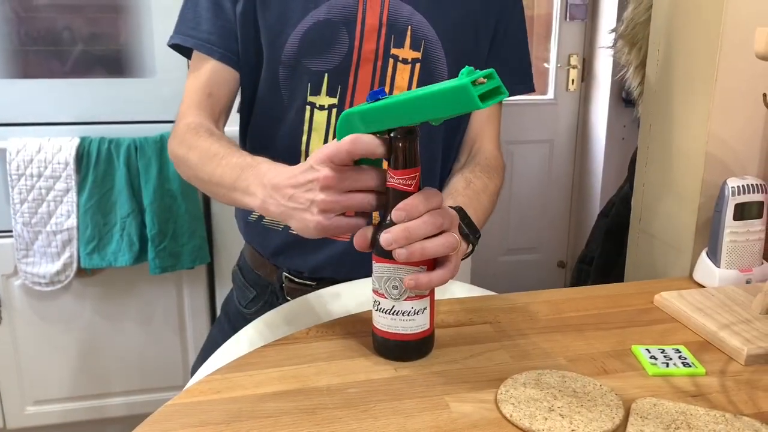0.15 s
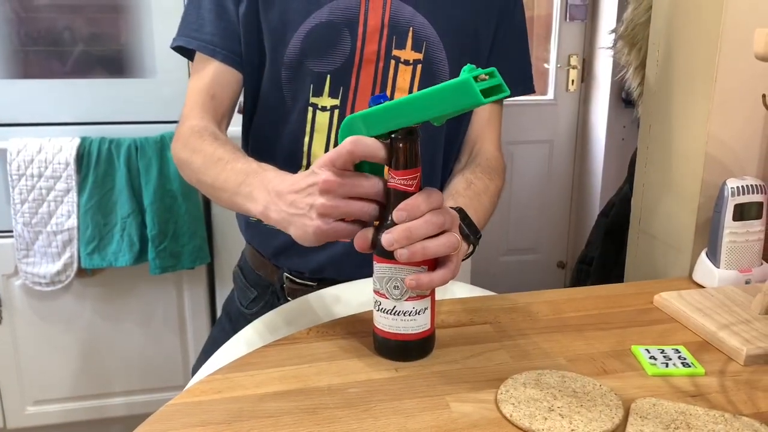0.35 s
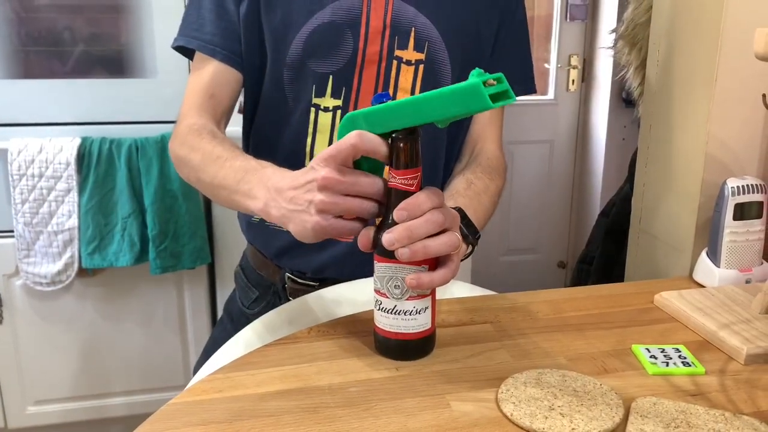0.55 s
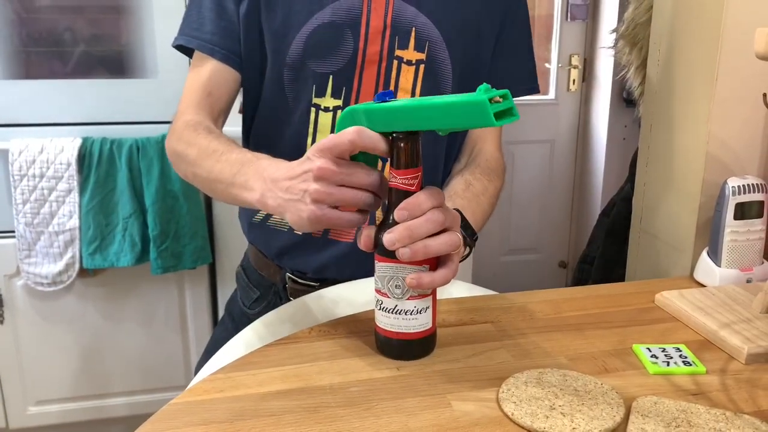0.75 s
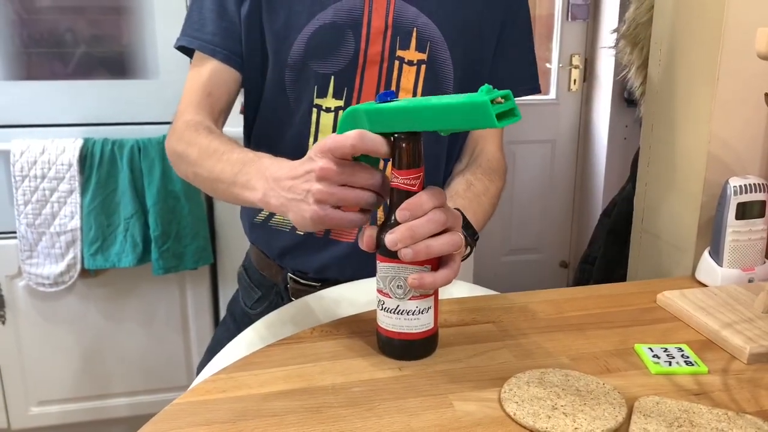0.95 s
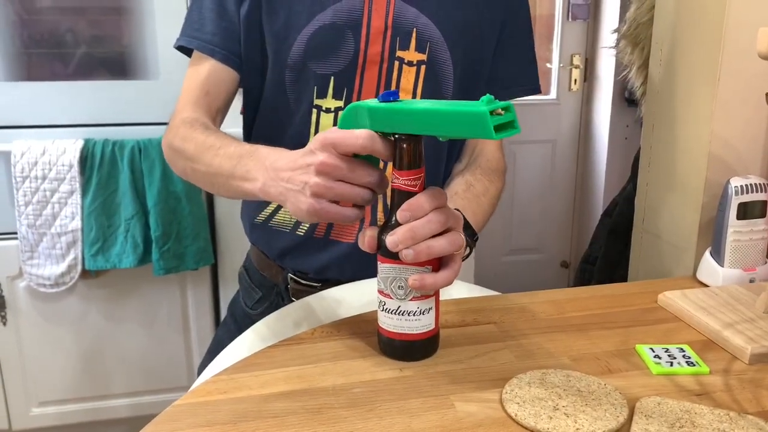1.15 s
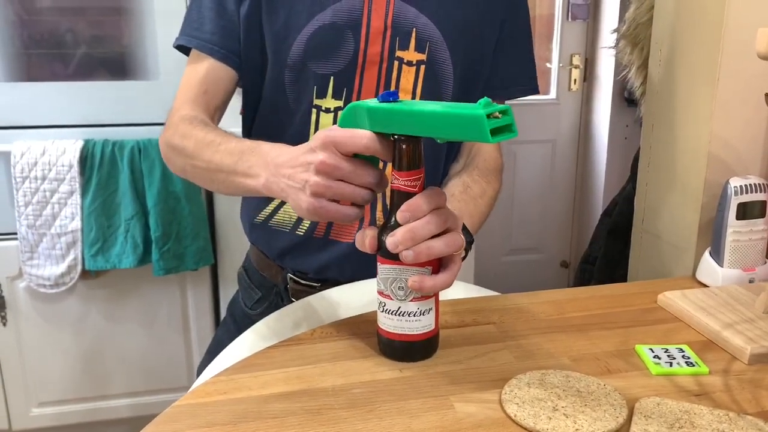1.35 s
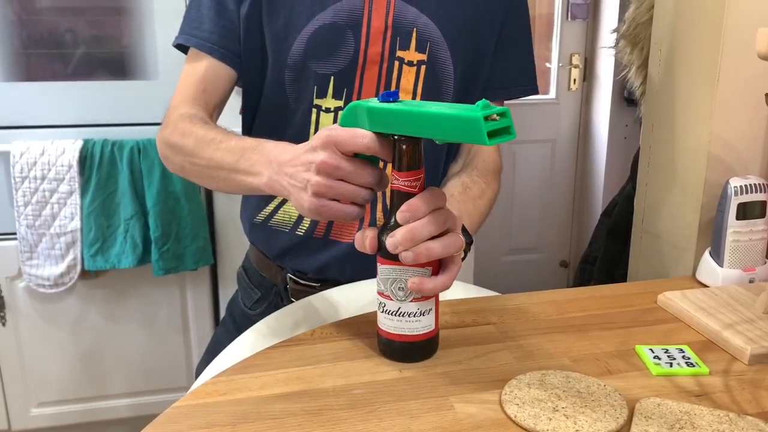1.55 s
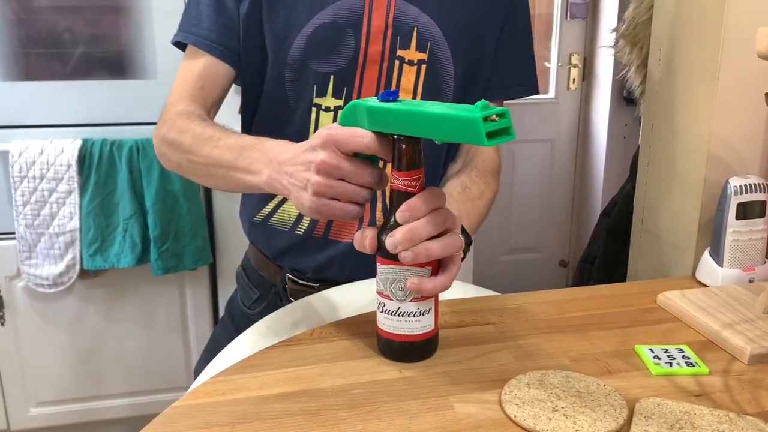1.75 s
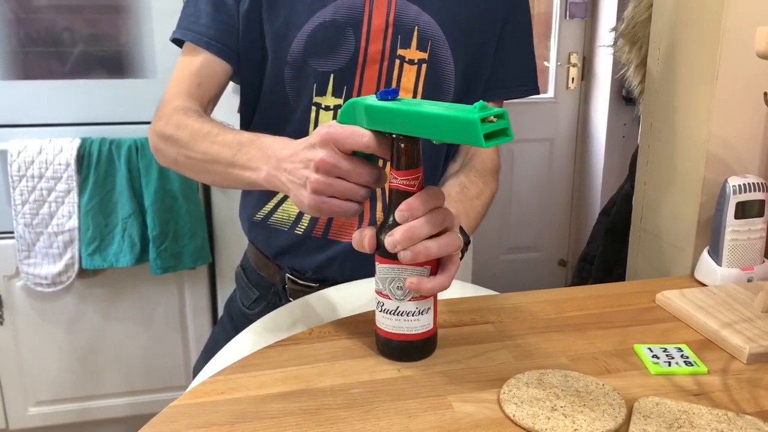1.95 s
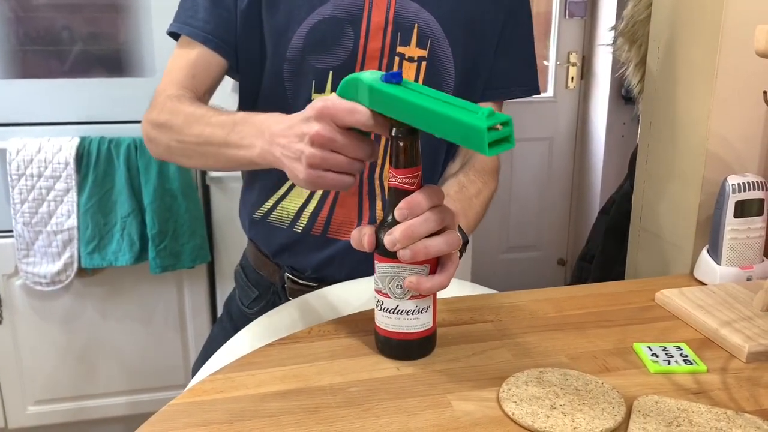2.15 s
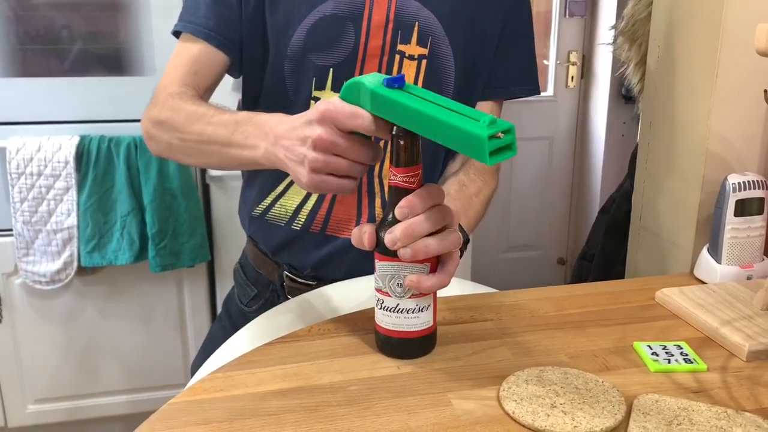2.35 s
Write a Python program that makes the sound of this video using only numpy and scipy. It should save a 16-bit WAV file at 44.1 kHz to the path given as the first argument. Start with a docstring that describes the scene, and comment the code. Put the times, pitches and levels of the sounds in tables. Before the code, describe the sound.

A plastic bottle opener clacks against a glass bottle, then snaps rapidly and pops the cap off

```python
"""Opening a bottle with a plastic opener

A pistol-shaped plastic opener works on a glass bottle on a wooden table: snaps are noise cracks with ringing
modes, knocks on the bottle add table thumps, rubs on the cap are grainy noise, bumps are low damped modes.
The cap comes off in a sharp noise burst and a short ring of decaying sines. Shaped noise makes the low room
rumble and the faint taps, two of them a second apart as of a wall clock. A small kitchen adds echoes and a tail."""
import sys
import numpy as np
from scipy import signal
from scipy.fft import rfft, irfft
from scipy.io import wavfile

SR = 44100
rng = np.random.default_rng(int(sys.argv[2]) if len(sys.argv) > 2 else 0)


def wav_out(sig):
    """Save sig, one row per channel (or a flat mono array), as 16-bit PCM at SR to the path in sys.argv[1]."""
    wavfile.write(sys.argv[1], SR, np.round(np.clip(np.atleast_2d(sig).T, -1, 1) * 32767).astype(np.int16))


N = 110250
T = np.arange(N) / SR
HZ = np.arange(N // 2 + 1) * SR / N
SHORT = T[:8192]  # time axis of one contact
HALF_SECOND = T[:SR // 2]  # time axis of rings and of the room tail


def from_db(db):
    """Decibels to gain."""
    return 10 ** (np.asarray(db) / 20)


def at_hz(points, hz, axis=1):
    """Read a table column, interpolated along log frequency."""
    p = np.array(points)
    return np.interp(np.log(hz + 1e-9), np.log(p[:, 0]), p[:, axis])


def noise(points, size, tilt_db=0):
    """Random noise of rms 1 with a drawn spectrum; the treble tilts by tilt_db per octave above a knee."""
    knee_hz = 3180
    hz = np.arange(size // 2 + 1) * SR / size
    octaves_up = np.log2(np.maximum(hz / knee_hz, 1))
    gain = from_db(at_hz(points, hz) + tilt_db * octaves_up)
    x = irfft(rfft(rng.standard_normal(size)) * gain, size)
    return x / x.std()


def grit(t):
    """Many tiny contacts make the level chatter; the gain has rms 1."""
    spread_db, grain_s = 2.5, 0.0014
    steps = np.clip(rng.standard_normal(len(t)), -2, 2)
    gain = from_db(spread_db * np.interp(t / grain_s, np.arange(len(t)), steps))
    return gain / np.sqrt(np.mean(gain ** 2))


def burst(points, rise_s, decay_s, tilt_db=0):
    """A contact excites dense, chattering vibration that dies exponentially."""
    attack = 1 - np.exp(-SHORT / rise_s)
    decay = np.exp(-SHORT / decay_s)
    return noise(points, len(SHORT), tilt_db) * grit(SHORT) * attack * decay


def ring(modes):
    """A struck body sounds as decaying sines; neighbouring modes start in opposite directions."""
    t = HALF_SECOND
    out = np.zeros(len(t))
    for k, (hz, db, t60) in enumerate(modes):
        decay = from_db(db - 60 * t / t60)
        out += (-1) ** k * decay * np.sin(2 * np.pi * hz * t)
    return out


def add(out, s, db, sound):
    """Mix a sound in at a time and level."""
    i = int(np.clip(s * SR, 0, N - 1))
    out[i:i + len(sound)] += from_db(db) * sound[:N - i]


def room_tone():
    """Rumble common to both sides, with a faint wide hiss from a side signal."""
    # rumble and hiss spectrum: (frequency [Hz], level [dB])
    floor = [(20, -1.5), (35, 0), (65, 2), (100, -8), (200, -16), (400, -24.5), (750, -27.5), (1020, -25),
             (1400, -29), (3000, -38), (7000, -47.5), (9500, -40), (14500, -46.5), (16000, -52)]
    # stereo width: (frequency [Hz], side against mid [dB])
    floor_apart = [(30, -17), (120, -13), (400, -4.5), (1000, -2), (4000, -0.5), (15000, -0.5)]
    mid = noise(floor, N)
    side = irfft(rfft(noise(floor, N)) * from_db(at_hz(floor_apart, HZ)), N)
    return from_db(-63) * np.array([mid + side, mid - side])


def kitchen():
    """The room answers a click with a diffuse tail that builds up, then dies band by band."""
    # room tail: (frequency [Hz], reverberation [dB], t60 [s], left-right likeness [-1 to 1])
    room = [(97.6, -9, 1, 0.65), (300, -3, .26, -0.059), (800, -3, 0.34, 0.13), (2000, -3, 0.28, -0.4),
            (5000, -3, 0.28, 0.0037), (8870, -9.5, 0.2, 0.29), (15000, -4, .175, -0.2)]
    build_s = 0.0033
    t, out = HALF_SECOND, 0
    edges = np.geomspace(45, 18000, 14)
    for low, high in zip(edges, edges[1:]):
        hz = np.sqrt(low * high)
        db, t60 = at_hz(room, hz), at_hz(room, hz, axis=2)
        alike = np.clip(at_hz(room, hz, axis=3), -1, 1)
        mid, side = rng.standard_normal((2, len(t)))
        shape = np.exp(-np.log(1000) * t / t60) * (1 - np.exp(-(t / build_s) ** 2))
        opposed = side * np.array([[1], [-1]])
        tail = shape * (np.sqrt(1 + alike) * mid + np.sqrt(1 - alike) * opposed)
        band = signal.butter(2, [low, high], "band", fs=SR, output="sos")
        tail = signal.sosfilt(band, tail)
        # energy in proportion to bandwidth, before the band's own level
        bandwidth_share = (high - low) / (SR / 2)
        energy = np.sum(tail ** 2) / 2
        out = out + tail * from_db(db) * np.sqrt(bandwidth_share / energy)
    return out


def ticks():
    """Faint ticks and taps across the room, noise bursts with a slow, blurred onset."""
    # faint ticks and taps: (time [s], level [dB])
    taps = [(.617, -49), (.850, -63.5), (1.628, -51)]
    # their spectrum: (frequency [Hz], level [dB])
    tick_spectrum = [(150, -12), (550, -6), (800, -3.5), (1000, 5), (1200, -2.5), (1450, -10.5),
                     (2500, -14), (5000, -20), (9000, -43), (15000, -47)]
    out = np.zeros(N)
    for s, db in taps:
        add(out, s, db, burst(tick_spectrum, rise_s=0.011, decay_s=0.022))
    return out


def bumps():
    """Soft contacts of the hands and bottle set the lowest modes of the table going."""
    # dull bumps: (time [s], level [dB])
    contacts = [(0.033, -47.5), (0.225, -39), (.305, -43), (.462, -47.5), (.505, -50), (2.053, -44),
                (2.202, -42.5), (2.219, -33.5)]
    # low table modes: (frequency [Hz], level [dB], t60 [s])
    bump_modes = [(57, -9.5, .26), (69, 2.5, 0.14), (106, -8.5, 0.39), (130.4, -5.5, .2), (172, -8, 0.054),
                  (204.3, -7.5, .2)]
    contact_s = 0.0011
    out = np.zeros(N)
    push = SHORT * np.exp(-2 * np.pi * SHORT / contact_s)
    boom = signal.fftconvolve(ring(bump_modes), push / push.sum())
    for s, db in contacts:
        add(out, s, db, boom)
    return out


def rubs():
    """Plastic slides on the cap: grainy friction noise swells and dies away."""
    # strokes: (time of the peak [s], level [dB], rise [s], fall [s], brightness [dB per octave])
    strokes = [(.075, -61.5, .04, .012, -16), (.106, -57, 0.023, .016, -8.5),
               (1.462, -67, 0.013, 0.022, 1.5), (1.582, -57.5, 0.034, 0.0054, 2.5)]
    # friction spectrum: (frequency [Hz], level [dB])
    rub_spectrum = [(300, -10), (1000, -14.5), (1800, -5.5), (2600, -13.5), (4800, -10), (6000, -8),
                    (8800, -3), (9800, 7.5), (10800, -7.5), (13300, -3), (15500, -6)]
    grain_db, grain_count = 2.5, 1200  # spread of the level, and its random points over the whole scene
    out = np.zeros(N)
    for s, db, rise_s, fall_s, tilt_db in strokes:
        grain = np.interp(T, np.linspace(0, T[-1], grain_count), rng.standard_normal(grain_count))
        stroke = np.exp(np.minimum(T - s, 0) / rise_s - np.maximum(T - s, 0) / fall_s)
        out += from_db(db + grain_db * grain) * stroke * noise(rub_spectrum, N, tilt_db)
    return out


def slide():
    """The slide strikes home: it clacks against the bottle, which thumps the table top."""
    # blows: (time [s], clack [dB], thump into the table [dB])
    blows = [(0.2211, -20.5, -36), (0.2286, -26.5, -21.5), (0.2328, -43.5, -21.5), (2.0242, -35.5, -59)]
    # clack spectrum: (frequency [Hz], level [dB])
    clack_spectrum = [(40, -24), (150, -2.5), (420, -9.5), (600, 1), (1000, -25.5), (1370, 5.5), (1600, -4),
                      (1850, 0), (2150, -0.5), (2600, -6.5), (3500, -16.5), (4700, -10), (6000, -27.5),
                      (10000, -28), (15000, -30.5)]
    # ringing of the clack, then of the table top: (frequency [Hz], level [dB], t60 [s])
    clack_modes = [(734, -23.5, .1), (1350, -12, 0.095), (1830, -17, 0.057), (2143, -16, .12),
                   (3120, -29.5, .1), (4770, -25.5, 0.16)]
    table_modes = [(132.5, -6, .24), (170.5, -1.5, 0.15), (206, -13.5, 0.13), (320, 1, .11),
                   (345, -14, .09), (580, -24.5, .08)]
    out = np.zeros(N)
    for s, clack_db, thump_db in blows:
        add(out, s, clack_db, burst(clack_spectrum, rise_s=0.00028, decay_s=0.0046))
        add(out, s, clack_db, ring(clack_modes))
        add(out, s, thump_db, ring(table_modes))
    return out


def opener():
    """Each snap of the mechanism is a crack, a hollow housing knock and a brief ring of the plastic."""
    # snaps: (time [s], crack [dB], treble slope [dB per octave], rise [s], decay [s], housing knock [dB])
    snaps = [(0.191, -51, -5.5, 0.0038, 0.038, -45), (.2138, -24.5, 1.5, 0.00022, 0.0052, -38.5),
             (0.4906, -33.5, -8.5, 0.0014, 0.004, -56), (1.9690, -46.5, -11.5, 0.0044, 0.053, -63.5),
             (2.0238, -34, -1, .0003, 0.003, -40), (2.0381, -46, -1, .001, .01, -37),
             (2.0583, -17, -0.5, 0.00022, 0.0026, -28.5), (2.0704, -33, -1.5, 0.0011, .005, -37.5),
             (2.076, -29.5, 5.5, 0.00049, 0.0061, -41), (2.1068, -29.5, -0.5, 0.00023, .003, -28),
             (2.1190, -46.5, -5, .001, .006, -38.5)]
    # spectra of the crack and of the hollow housing: (frequency [Hz], level [dB])
    crack_spectrum = [(100, -3), (500, -6.5), (1200, -7), (2300, -2), (2750, -9), (3500, -1), (4200, -1),
                      (4900, 0), (6500, -4), (8800, -1.5), (11000, -6.5), (14500, -16), (16000, -26.5)]
    housing_spectrum = [(40, -24), (80, -8.5), (130, -3.5), (200, 7.5), (260, -11.5), (330, -0.5),
                        (410, -8), (560, 5), (800, -7), (1200, -10.5), (2200, -12), (4000, -30),
                        (12000, -51)]
    # ringing of the plastic: (frequency [Hz], level [dB], t60 [s])
    plastic_modes = [(2020, -37, .12), (2200, -31, .22), (2302, -28, .25), (3295, -35, .1),
                     (3688, -32, .13), (4834, -34, .1)]
    ring_db, ring_per_dullness = -2.5, 1.6  # duller snaps ring more: dB per dB of slope
    out = np.zeros(N)
    for s, db, tilt_db, rise_s, decay_s, knock_db in snaps:
        add(out, s, db, burst(crack_spectrum, rise_s, decay_s, tilt_db))
        add(out, s, knock_db, burst(housing_spectrum, rise_s, decay_s=0.015))
        add(out, s, db + ring_db - ring_per_dullness * tilt_db, ring(plastic_modes))
    return out


def pop():
    """The seal leaks, the gas bursts out as turbulent noise, and the freed cap rings."""
    # gas spectrum: (frequency [Hz], level [dB])
    gas_spectrum = [(40, -16.5), (100, -5.5), (200, 4), (330, -8), (520, -6.5), (850, -2.5), (1250, -7.5),
                    (1800, 1), (2250, 0), (2700, -7.5), (3700, -1.5), (4400, -5), (5000, 7), (6000, -9),
                    (8800, 2), (10500, -3.5), (13500, -3.5), (15000, -6.5), (16000, -17.5)]
    # ringing of the cap: (frequency [Hz], level [dB], t60 [s])
    cap_modes = [(991, -46.5, 0.38), (1780, -46, 0.21), (3606, -26.5, 0.041), (4440, -37.5, 0.11),
                 (4800, -37.5, 0.17), (4994, -37, 0.2), (5010, -40.5, 0.3), (5080, -43.5, .17)]
    pop_s, cap_s = 2.1968, 2.2005  # full burst, then the cap flies free
    leak_s, rise_s, hold_s, fall_s = 0.0065, 0.0035, 0.0066, 0.003  # the leak starts leak_s before the burst
    t = T - pop_s
    swell = np.exp(np.minimum(t, 0) / rise_s) * (t > -leak_s)
    flow = swell * np.exp(-np.maximum(t - hold_s, 0) / fall_s)
    out = from_db(-19.5) * flow * noise(gas_spectrum, N)
    add(out, cap_s, 0, ring(cap_modes))
    return out


def scene():
    """Direct sound at two close microphones, first echoes, the tail and the room tone."""
    # the two microphone ports: (frequency [Hz], left lead [rad], left minus right [dB])
    ports = [(60, .05, -0.25), (300, .3, 0.5), (600, .5, -2.5), (1300, 1.4, -0.5), (2400, 1.3, 0.55),
             (4600, 1.7, -4.5), (8500, 1.9, 0.3), (14200, 1.1, 0.56)]
    # reflections from table and walls: (delay [s], level [dB])
    reflections = [(.0026, -20), (0.0133, -11.5), (0.028, -18)]
    source = ticks() + bumps() + rubs() + slide() + opener() + pop()
    lead, balance_db = at_hz(ports, HZ), at_hz(ports, HZ, axis=2)
    left = from_db(balance_db / 2)
    right = from_db(-balance_db / 2) * np.exp(-1j * lead)
    direct = irfft(rfft(source) * np.array([left, right]), N)
    echoes = np.zeros((2, N))
    for s, db in reflections:
        echoes += from_db(db) * np.pad(direct, ((0, 0), (int(s * SR), 0)))[:, :N]
    tail = signal.fftconvolve(source[None], kitchen(), axes=1)[:, :N]
    return direct + echoes + tail + room_tone()


def record(dry):
    """The microphones have a narrow dip in the treble; the top is cut steeply."""
    dip_hz, dip_q, cutoff_hz = 11610, 8, 16300
    coloured = signal.lfilter(*signal.iirnotch(dip_hz, dip_q, fs=SR), dry)
    top_cut = signal.cheby2(16, 60, cutoff_hz, fs=SR, output="sos")
    return signal.sosfilt(top_cut, coloured)


dry = scene()
out = record(dry)
wav_out(out)
```